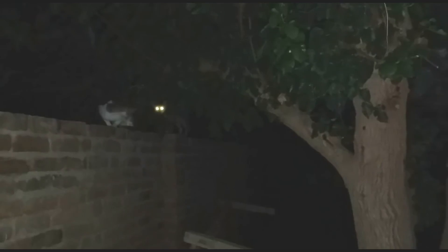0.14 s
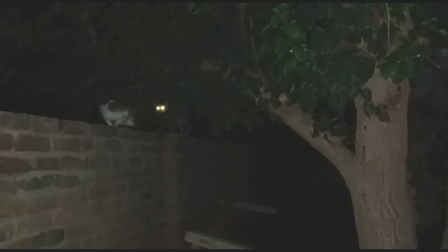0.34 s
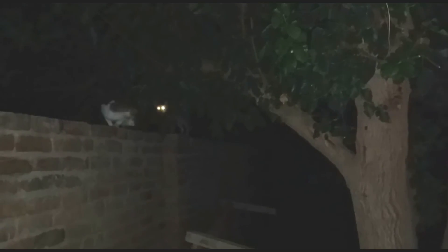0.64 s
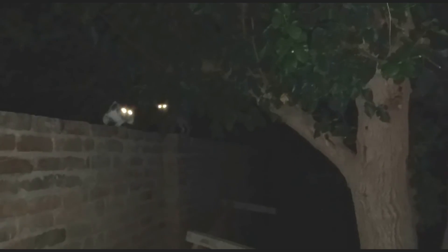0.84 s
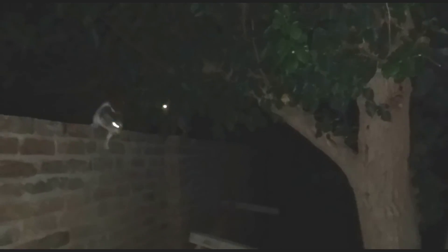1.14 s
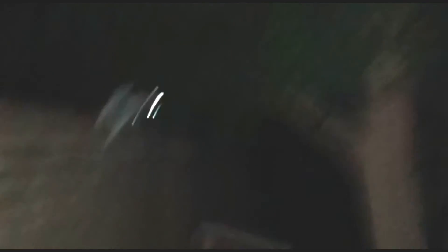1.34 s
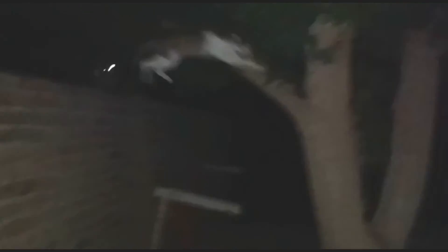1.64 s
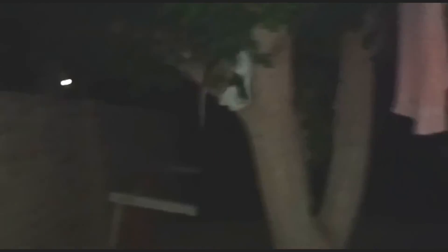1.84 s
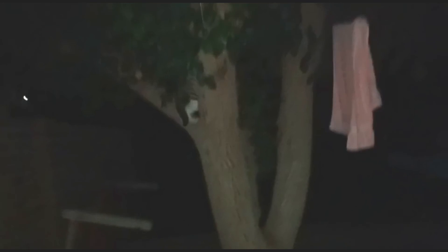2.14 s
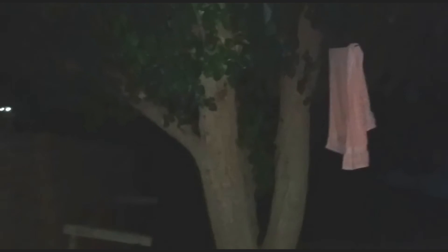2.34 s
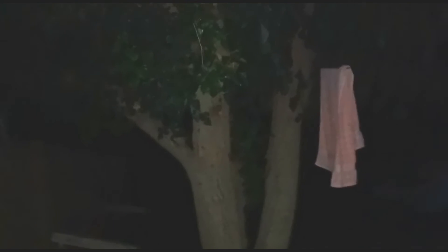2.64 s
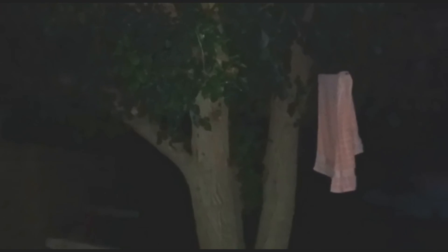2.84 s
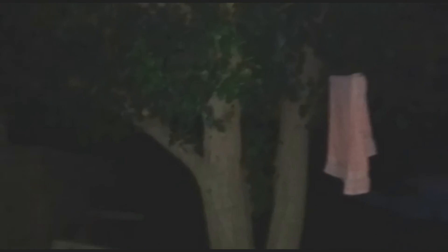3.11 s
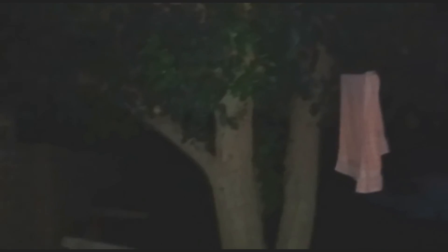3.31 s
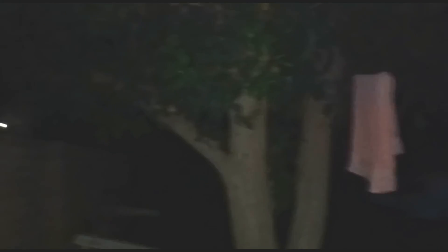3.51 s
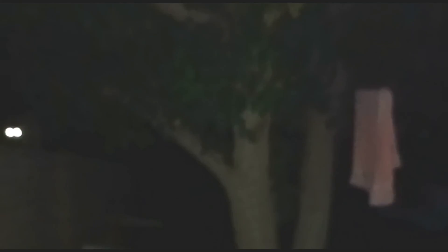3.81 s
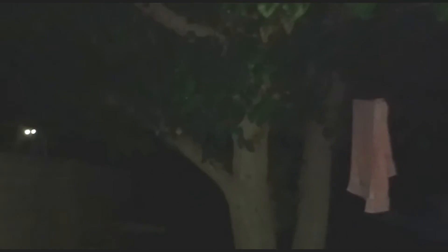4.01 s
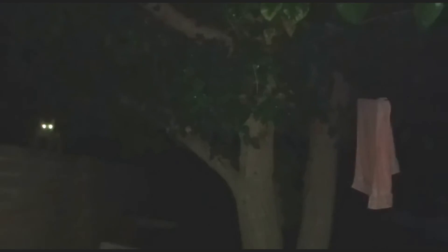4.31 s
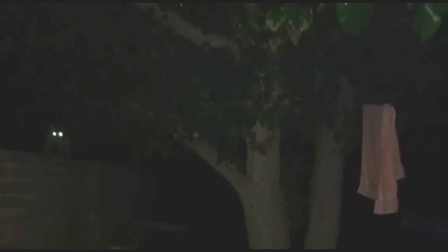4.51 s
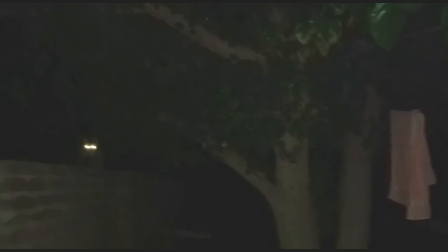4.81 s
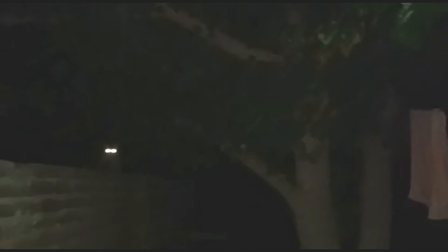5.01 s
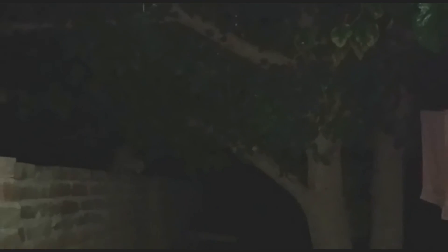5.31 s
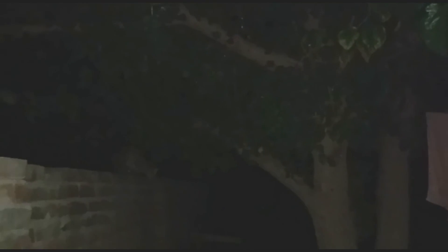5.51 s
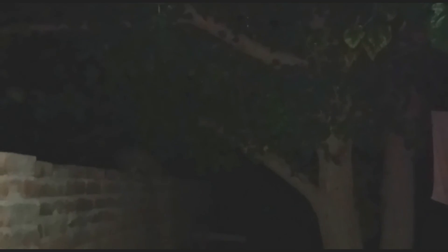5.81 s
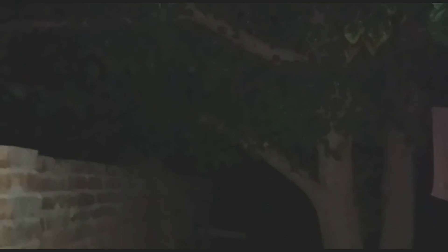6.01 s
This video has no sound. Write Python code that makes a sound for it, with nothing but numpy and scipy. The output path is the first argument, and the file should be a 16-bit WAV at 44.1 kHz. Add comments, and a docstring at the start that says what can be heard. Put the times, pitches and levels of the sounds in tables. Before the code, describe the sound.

A steady low fan tone and night air lie under a sudden cat fight outdoors. A hoarse yowl clears, rises and breaks into grating screeching from two animals, with short slaps of echo off brick. Leaves rustle and claws scratch bark, a cat spits and hisses, then rasps and cries into another screech. The noise subsides to humming, high insect ticking and a faint rising moan. The stereo microphone is at a distance in the yard.

```python
"""A cat's yowl, a harmonic series, clears and climbs at night, then breaks into a screech of irregular pulses and
noise; a rival's cry falls through it and the screech's low fundamental sounds beneath it. A cat scrambles up a
tree as noise bursts of leaves and claws, spits and hisses with resonant noise; rasps and a cry lead into a second
screech. Last, a low moan, one gliding sine, rises. Throughout, a fan motor drones in modulated sines beside a faint
whine and night air noise, a bush cricket ticks in runs of falling chirps, and brick walls answer with echoes."""
import sys
import numpy as np
from scipy import signal
from scipy.fft import rfft, irfft, next_fast_len
from scipy.io import wavfile
from scipy.ndimage import uniform_filter1d, minimum_filter1d, map_coordinates

SR = 44100
rng = np.random.default_rng(int(sys.argv[2]) if len(sys.argv) > 2 else 0)


def store_pcm(level_fs):
    """Save levels as 16-bit WAV."""
    pcm = np.round(np.clip(level_fs, -1, 1) * 32767).astype(np.int16)
    wavfile.write(sys.argv[1], SR, np.atleast_2d(pcm).T)


N = 271215

# Vocal effort of the yowl: (time [s], level [dB])
YOWL_EFFORT = [(0.25, -40), (0.316, -26.5), (0.364, -29), (0.39, -18), (0.484, -23.5), (0.498, -13),
               (0.528, -15), (0.575, -18), (0.634, -17), (0.666, -11.5), (0.702, -21), (0.736, -17),
               (0.775, -17)]
# Its strongest partials: (multiple of the pitch [1], relative level [dB])
YOWL_PARTIALS = [(1, -5.5), (1.5, -26), (2, 4.5), (3, -17.5)]
# Throat resonances that light up its overtones: (centre [Hz], width [Hz], relative level [dB])
YOWL_THROAT = [(2610, 320, -11), (5670, 1300, -20)]
YOWL_START_HZ, YOWL_CLIMB_HZ_PER_S = 441, 1000  # a steady climb of the pitch
LEAP_HZ, LEAP_AT_S, LEAP_WIDTH_S = 254.4, 0.45, 0.033  # one leap as the voice opens
CLEARS_AT_S, CLEARING_WIDTH_S = 0.367, 0.0052  # the hoarse start turns into a clear tone
REMAINING_NOISE_SHARE = 0.013  # share of the power [0-1]
BRIGHTENS_AT_S = 0.56  # the top overtones come in as the cat strains


def yowl():
    """Source and filter: a hoarse start clears into rising harmonics, the second one strongest."""
    effort_db, = curves(YOWL_EFFORT)
    age = np.minimum(since(YOWL_EFFORT[0][0]), 1)
    leap = LEAP_HZ * step(LEAP_AT_S, LEAP_WIDTH_S)
    pitch = YOWL_START_HZ + YOWL_CLIMB_HZ_PER_S * age + leap
    noise_share = np.clip(1 - step(CLEARS_AT_S, CLEARING_WIDTH_S) + REMAINING_NOISE_SHARE, 0, 1)
    jitter = 0.005 * wobble(120) + 0.06 * noise_share * wobble(400)
    phase = angle(pitch * (1 + jitter))
    tone = np.zeros(N)
    for multiple, level_db in YOWL_PARTIALS:
        tone += amp(level_db + 1.2 * wobble(30)) * np.sin(multiple * phase)
    # higher harmonics light up in patches as they sweep through the throat resonances
    strain = step(BRIGHTENS_AT_S, 0.016)
    for multiple, gain in [(4, 1), (5, strain), (6, strain)]:
        throat = sum(amp(level_db) * resonance(multiple * pitch, centre, width)
                     for centre, width, level_db in YOWL_THROAT)
        tone += gain * throat * amp(2.5 * wobble(35)) * np.sin(multiple * phase)
    # a small mouth radiates little bass, so the fundamental emerges only as it climbs
    tone = steady(filtered(tone, lambda hz: 1 / (1 + (800 / (hz + 1)) ** 8)))
    rasp = mouth(rng.standard_normal(N), 2 * pitch, q=2.2)
    mixture = np.sqrt(1 - noise_share) * tone + np.sqrt(noise_share) * rasp
    voice = mixture * amp(effort_db) * during(YOWL_EFFORT)
    return in_yard(voice, lead_ms=0.06, pan_db=-1.5, wet_db=-11)


def screeches():
    """Superposition and reflection: all the rough calls sound together and the yard answers them."""
    cries = cry(FALLING_CRY) + cry(LEADING_CRY)
    calls = wall_screech() + cries + rasps() + tree_screech()
    return in_yard(calls, lead_ms=0.06, pan_db=-1.8, wet_db=-8)


# The screech on the wall: (time [s], mouth resonance [Hz], mouth band level [dB], upper throat level [dB])
WALL_SCREECH = [(0.765, 1770, -19.5, -25), (0.844, 1630, -11, -22), (0.905, 1440, -12.5, -24),
                (0.985, 1450, -13.5, -27.5), (1.075, 1090, -19.5, -26.5), (1.126, 1070, -16.5, -29),
                (1.19, 945, -20.5, -31.5), (1.268, 955, -18.5, -36.5), (1.292, 970, -34.5, -46),
                (1.395, 970, -32, -45)]
# Its roughness: (time [s], noise share of the power [0-1], depth of alternating pulses [0-1])
WALL_ROUGHNESS = [(.78, .4, .45), (.93, .14, .3), (1.13, .28, .95)]
# Its upper throat: (centre with jaw shut [Hz], centre with jaw wide [Hz], width [Hz], relative level [dB])
WALL_THROAT = [(1700, 1800, 640, -12.5), (2375, 2764, 174, -0.5), (4800, 5310, 390, -21),
               (5540, 6370, 1200, -21)]
SAG_START_HZ, SAG_REST_HZ, SAG_S = 469, 400.3, 0.15  # the pitch sags toward a resting value


def wall_screech():
    """Irregular fold vibration: rough at the break, then voiced, then doubled and rough as the mouth closes."""
    centre, mouth_db, upper_db = curves(WALL_SCREECH)
    noise_share, doubling = curves(WALL_ROUGHNESS)
    sag = np.exp(-since(WALL_SCREECH[0][0]) / SAG_S)
    pitch = SAG_REST_HZ + (SAG_START_HZ - SAG_REST_HZ) * sag
    source = folds(pitch, noise_share, jitter=0.011, lurch=0.02, rattle=0.45, doubling=doubling)
    return screech(source, centre, mouth_db, upper_db, WALL_THROAT, q=2.7) * during(WALL_SCREECH)


# The screech from the tree: (time [s], mouth resonance [Hz], mouth band level [dB], upper throat level [dB])
TREE_SCREECH = [(3.25, 1327, -23, -29), (3.285, 1478, -16, -31.5), (3.345, 1603, -19.5, -23),
                (3.41, 1501, -22.5, -28), (3.48, 1618, -20.5, -22), (3.525, 1586, -12, -27.5),
                (3.565, 1397, -21, -30.5), (3.69, 1019, -23, -36), (3.78, 982, -32.5, -46),
                (3.93, 989, -36.5, -54)]
# Upper throat, shared with the cries: (jaw shut [Hz], jaw wide [Hz], width [Hz], relative level [dB])
TREE_THROAT = [(770, 1234, 89, 3), (2270, 2460, 760, -5), (2400, 3460, 270, -11.5),
               (5000, 5270, 560, -12.5), (6500, 7500, 2900, -25)]
PITCH_BREAKS_AT_S = 3.58  # turbulence takes over from here


def tree_screech():
    """Coupled pitch and resonance: both rise under strain, hold, and fall back into a broken growl."""
    centre, mouth_db, upper_db = curves(TREE_SCREECH)
    noise_share = 0.28 + 0.5 * step(PITCH_BREAKS_AT_S, 0.03)
    source = folds(centre / 3, noise_share, jitter=0.022, lurch=0.036, rattle=0.65, doubling=0.9)
    return screech(source, centre, mouth_db, upper_db, TREE_THROAT, q=2.5) * during(TREE_SCREECH)


# A rival's cry that falls through the first screech: (time [s], mouth resonance [Hz], level [dB])
FALLING_CRY = [(0.80, 1880, -22.5), (0.848, 1720, -7), (0.89, 1510, -21), (1.06, 1366, -21),
               (1.125, 1210, -15), (1.17, 1130, -23)]
# The cry that leads into the second screech: (time [s], mouth resonance [Hz], level [dB])
LEADING_CRY = [(2.915, 1462, -21), (2.935, 1479, -23), (3.06, 1475, -29), (3.08, 1124, -24.5),
               (3.19, 1213, -14.5), (3.255, 1320, -24)]


def cry(rows):
    """Resonance tuning: a hoarse voice passes a narrow mouth that sits on its third harmonic."""
    centre, level_db = curves(rows)
    source = folds(centre / 3, 0.38, jitter=0.02, lurch=0.018, rattle=0.5, doubling=0.4)
    return screech(source, centre, level_db, level_db - 22, TREE_THROAT, q=4.2) * during(rows)


# Hoarse bursts around the leading cry: (peak time [s], rise [s], fall [s], level [dB])
RASPS = [(2.838, 0.078, 0.064, -22), (2.936, 0.1, 0.13, -21), (3.104, 0.082, 0.046, -23),
         (3.144, 0.03, 0.023, -12.5), (3.19, 0.093, 0.092, -17)]
RASP_HZ, RASP_Q = 1183, 2.74  # mouth resonance and its sharpness


def rasps():
    """Turbulent excitation: fluttering noise without pitch rings the narrow mouth."""
    turbulence = rng.standard_normal(N) * amp(2 * wobble(150))
    return swells(RASPS) * mouth(turbulence, np.full(N, RASP_HZ), RASP_Q)


SHUT_HZ, WIDE_HZ = 1060, 1610  # mouth resonance with the jaw nearly shut and wide open


def screech(source, centre, mouth_db, upper_db, throat, q):
    """Formant filtering: the folds ring mouth and upper throat, whose resonances climb as the jaw opens."""
    gape = np.clip((centre - SHUT_HZ) / (WIDE_HZ - SHUT_HZ), 0, 1.2)

    def throat_gain(hz, opening):
        return sum(amp(level_db) * resonance(hz, shut + (wide - shut) * opening, width)
                   for shut, wide, width, level_db in throat)

    mouth_band = amp(mouth_db) * mouth(source, centre, q)
    throat_band = amp(upper_db) * moving(source, gape, throat_gain)
    return mouth_band + throat_band


RATTLE_HZ = 111.9  # mean rate at which loose throat tissue chops the hoarse calls


def folds(rate, noise_share, jitter, lurch, rattle, doubling):
    """Irregular self-oscillation: overdriven folds mix pulses and turbulence, chopped by the throat's rattle."""
    phase = angle(rate * (1 + jitter * wobble(350) + lurch * wobble(45)))
    # the throat rings on after each pulse and spreads it over the whole cycle
    pulses = sum(np.cos(k * phase - k * k * np.pi / 7) for k in np.arange(2, 21))
    # in fits, strong and weak pulses alternate and add strands halfway between the harmonics
    alternation = (doubling + 0.3 * wobble(25)) * np.sign(np.cos(phase / 2))
    pulses = steady(pulses * (1 + alternation))
    turbulence = unit(rng.standard_normal(N) * (1 + 0.8 * np.cos(phase)))
    rattling = np.sin(angle(RATTLE_HZ * (1 + 0.3 * wobble(70))))
    chop = (1 + rattle * rattling) * amp(1.2 * wobble(110))
    mixture = np.sqrt(1 - noise_share) * pulses + np.sqrt(noise_share) * turbulence
    return ragged(mixture * chop, depth_db=3.2)


def ragged(x, depth_db):
    """Spectral modulation: strands of a strained voice flare and drop out in short patches."""
    z = signal.stft(x, SR, nperseg=1024)[2]
    patches = uniform_filter1d(rng.standard_normal(z.shape), size=3, axis=0)
    patches = unit(uniform_filter1d(patches, size=3, axis=1))
    return signal.istft(z * amp(depth_db * patches), SR, nperseg=1024)[1][:N]


# A spit and a long throaty hiss: (peak time [s], rise [s], fall [s], resonance scale [1], level [dB])
HISSES = [(1.851, 0.055, 0.11, 1.56, -36), (2.27, .2, 0.57, 0.965, -32.5)]
# Open throat before scaling: (centre [Hz], width [Hz], relative level [dB])
HISS_THROAT = [(1034, 560, 1), (1515, 130, -6), (1960, 780, -8), (5070, 1600, -15.5)]


def hisses():
    """Turbulence in a tube: air rasps in an open throat; bared teeth and drawn lips raise the spit's resonances."""
    out = np.zeros(N)
    for peak, rise, fall, scale, level_db in HISSES:
        def throat(hz):
            return sum(amp(db) * resonance(hz / scale, centre, width) for centre, width, db in HISS_THROAT)

        air = rng.standard_normal(N) * amp(3.2 * wobble(170))
        out += amp(level_db) * swell(peak, rise, fall) * unit(filtered(air, throat))
    return in_yard(out, lead_ms=0, pan_db=-2.5, wet_db=-7)


# The screech's low fundamental, then a low closed-mouth moan:
# (peak time [s], rise [s], fall [s], first pitch [Hz], last pitch [Hz], level [dB])
LOW_TONES = [(0.951, 0.118, 0.14, 455.6, 391, -30.5), (5.66, .16, 2.5, 350.7, 496.6, -32)]
GLIDE_S = 0.21  # time constant of the pitch


def low_fundamental_and_moan():
    """Pure tone: one sine each, the fundamental alone, whose pitch settles exponentially."""
    out = np.zeros(N)
    for peak, rise, fall, first_hz, last_hz, level_db in LOW_TONES:
        age = since(peak - rise)
        pitch = last_hz + (first_hz - last_hz) * np.exp(-age / GLIDE_S)
        phase = angle(pitch * (1 + 0.018 * wobble(60)))
        out += amp(level_db) * swell(peak, rise, fall) * unit(np.sin(phase))
    return in_yard(out, lead_ms=0.02, pan_db=-1, wet_db=-9)


# Lunges through the foliage: (peak time [s], rise [s], fall [s], level [dB])
LUNGES = [(1.17, 1.44, 0.52, -42), (1.87, 0.32, 0.11, -39), (2.42, 0.58, 0.42, -34.5),
          (3.55, 1.6, 0.64, -39.5), (3.98, 0.066, 0.17, -37)]
# Spectrum of leaves and claws: (frequency [Hz], relative level [dB])
LEAF_COLOUR = [(500, -31), (4500, -0.5), (8000, -5.5), (12500, -3.5), (15500, -8)]
# Claw ticks on the bark: (time [s], level at onset [dB])
CLAWS = [(1.1742, -34.5), (1.801, -41), (2.8509, -33.5), (3.9798, -36)]
# Soft paw thuds, before their onsets are smoothed: (time [s], level [dB])
PAWS = [(.84, -35), (1.03, -38), (1.25, -35.5)]
# Spectrum of the thuds: (frequency [Hz], relative level [dB])
PAW_COLOUR = [(25, -17), (140, 2), (260, 7), (1000, -64)]


def scramble():
    """Impact and friction noise: leaves thrash, claws tick on the bark, paws land and decay."""
    flutter = unit(amp(3 * wobble(800) + 1.2 * wobble(40)))
    leaves = swells(LUNGES) * rush(LEAF_COLOUR) * flutter
    claws = blows(CLAWS, t60=0.069) * rush(LEAF_COLOUR)
    thuds = uniform_filter1d(blows(PAWS, t60=1.0), size=400)
    return leaves + claws + thuds * rush(PAW_COLOUR)


def blows(rows, t60):
    """Exponential decay: each blow starts at once and loses 60 dB in t60 seconds."""
    t = np.arange(N) / SR
    return sum((t >= s) * amp(level_db - 60 * np.abs(t - s) / t60) for s, level_db in rows)


# Runs of chirps: (first chirp [s], end of run [s], period [s])
CHIRP_RUNS = [(0.076, 1.2, .0955), (2.53, 3.6, .112), (3.675, 6.15, .1028)]


def cricket():
    """Stridulation: three falling wing strokes a chirp, the middle strongest; foliage smears them into a hiss."""
    t = np.arange(-700, 700) / SR
    strokes = np.zeros(N + SR)
    for first, end, period in CHIRP_RUNS:
        for s in np.arange(first, end, period):
            for offset_s, level_db in [(-0.019, -44.5), (0, -41), (0.018, -49.5)]:
                hz = 7350 - 100000 * t + rng.normal(0, 121)
                gain = amp(level_db + rng.normal(0, 2.4)) * np.exp(-(t / 0.0037) ** 2)
                start = max(round((s + offset_s) * SR) - len(t) // 2, 0)
                strokes[start:start + len(t)] += gain * np.sin(angle(hz))
    strokes = strokes[:N]
    activity = np.sqrt(np.abs(uniform_filter1d(strokes ** 2, size=SR // 3)))
    # spectrum of the smear: (frequency [Hz], relative level [dB])
    hiss = rush([(6300, -14.5), (7200, -7.0), (7900, -8.0), (8800, -19.5)])
    return in_yard(strokes, lead_ms=0, pan_db=-4.5, wet_db=0.5) + amp(6.5) * activity * hiss


# Blade tone, before panning: (time [s], rms level [dB])
BLADE_TONE = [(0.78, -25), (1.14, -30.5), (1.49, -27.5), (2.47, -29.5), (3.7, -26.5), (4.99, -21),
              (6.15, -32.5)]
# Its lower sideband, the throb, before panning: (time [s], rms level [dB])
THROB = [(0, -45.5), (2.6, -35.5), (5, -40.5)]
# Weaker motor tones, before panning: (frequency [Hz], rms level [dB])
MOTOR_TONES = [(250.5, -51), (303, -45.5), (377, -51.5), (466.5, -46.5), (958, -52.5), (1453, -55.5)]
# Stereo balance: (time [s], left minus right level [dB])
FAN_PAN = [(3.8, 0.3), (5.2, -6.5), (6.15, -5.5)]
BLADE_HZ, SHAFT_HZ = 340, 21.7  # mean rates


def fan():
    """Amplitude modulation: a blade tone gains sidebands at the shaft rate, among weaker motor tones."""
    pan_db, = curves(FAN_PAN)
    blade_db, = curves(BLADE_TONE)
    throb_db, = curves(THROB)
    blade = angle(BLADE_HZ + 0.4 * wobble(6))
    shaft = angle(SHAFT_HZ + 0.7 * wobble(4))
    tone = amp(blade_db + 0.5 * wobble(16)) * np.sin(blade)
    lower = amp(throb_db + wobble(6)) * np.sin(blade - shaft)
    upper = amp(-48) * np.sin(blade + shaft)
    motor = np.zeros(N)
    for hz, level_db in MOTOR_TONES:
        motor += amp(level_db + 2.5 * wobble(6)) * np.sin(angle(hz + 1.2 * wobble(8)))
    sides = np.array([[0.5], [-0.5]])
    return np.sqrt(2) * (tone + lower + upper + motor) * amp(pan_db * sides)


# A faint tone that wanders: (time [s], frequency [Hz])
WHINE = [(3.2, 537.4), (4.4, 520.5), (5.75, 561.2)]


def whine():
    """Frequency modulation: one faint sine drifts and trembles in pitch."""
    hz = curves(WHINE)[0] + 5 * wobble(30)
    return amp(-42 + 2 * wobble(10)) * unit(np.sin(angle(hz)))


# Night air: (time [s], level [dB])
AIR = [(0, -33.5), (1.5, -37.5), (4.2, -35.5), (5.1, -34.5)]
# Its spectrum: (frequency [Hz], relative level [dB])
AIR_COLOUR = [(25, -62), (68, -4.5), (130, -3), (300, 5.5), (540, 7.5), (680, -4.5), (950, 2.5), (1200, -4),
              (1500, -2), (4000, -14), (9000, -24.5), (15500, -27)]


def night_air():
    """Broadband noise: a coloured stereo rush follows a slow level curve."""
    return amp(curves(AIR)[0]) * rush(AIR_COLOUR)


# Delay of the left channel behind the right: (time [s], lag [ms])
BACKGROUND_LAG = [(3.7, -0.17), (4.2, 0.17), (6.15, 0.065)]


def turning(pair):
    """Interaural delay: a drifting lag between left and right moves the background sideways."""
    lag = curves(BACKGROUND_LAG)[0] * SR / 1000  # in samples
    return np.array([map_coordinates(x, [np.arange(N) - side * lag], mode="mirror")
                     for x, side in zip(pair, (0.5, -0.5))])


# Decay of the brick yard: (frequency [Hz], time to fall 60 dB [s])
YARD = [(200, 0.013), (1500, 0.19), (10000, 0.0072)]


def in_yard(x, lead_ms, pan_db, wet_db):
    """Reverberation: direct sound may lead in the left channel, and the walls add a short scattered answer."""
    hz, t, z = signal.stft(rng.standard_normal((2, SR // 2)), SR, nperseg=256)
    decay = amp(-60 * t / along(YARD, hz)[:, None])
    tail = signal.istft(z * decay, SR, nperseg=256)[1]
    tail = tail / np.linalg.norm(tail[0])
    delayed = np.pad(x, (200, 0))[None]
    echo = signal.fftconvolve(delayed, tail, axes=1)[:, :N]
    sides = np.array([[0.5], [-0.5]])
    direct = filtered(x, lambda f: np.exp(2j * np.pi * f * sides * lead_ms / 1000))
    return (direct + amp(wet_db) * echo) * amp(sides * pan_db)


# Stereo likeness of noise: (frequency [Hz], left-right correlation [0-1])
LIKENESS = [(150, 0.92), (1200, 0.29), (5000, 0.026)]


def rush(colour):
    """Spatial coherence: stereo noise of rms 1, alike in the bass and unrelated in the treble."""
    def mid_side(hz):
        turn = np.arccos(np.clip(along(LIKENESS, hz), -1, 1)) / 2
        return amp(along(colour, hz)) * [np.cos(turn), np.sin(turn)]

    mid, side = filtered(rng.standard_normal((2, N)), mid_side)
    return unit(np.array([mid + side, mid - side]))


def mouth(x, centre, q):
    """Cavity resonance: one moving peak, applied twice, with steep skirts."""
    def gain(f, c):
        skirts = 1 / (1 + (c / f / 1.75) ** 10 + (f / c / 2) ** 8)
        return skirts / (1 + (q * (f / c - c / f)) ** 2)

    return moving(x, centre, gain)


def moving(x, centre, gain):
    """Time-varying filtering: apply gain(Hz, centre) as the centre moves, then hold the rms at 1."""
    hz, t, z = signal.stft(x, SR, nperseg=512)
    now = np.interp(t, np.arange(N) / SR, centre)
    return steady(signal.istft(z * gain(hz[:, None] + 1, now), SR, nperseg=512)[1][:N])


def resonance(hz, centre, width):
    """Resonance curve: a peak of gain 1 that halves at half a width to either side."""
    return 1 / (1 + (2 * (hz - centre) / width) ** 2)


def filtered(x, response):
    """Linear filtering: multiply the spectrum of x by a response of frequency."""
    m = next_fast_len(N + SR // 2)
    return irfft(rfft(x, m) * response(np.fft.rfftfreq(m, 1 / SR)), m)[..., :N]


SWELL_DB = 21.5  # range that each rise and fall time spans


def swell(peak, rise, fall):
    """Exponential envelope: the gain grows to its peak and dies away, evenly in dB."""
    t = np.arange(N) / SR - peak
    return amp(-SWELL_DB * np.minimum(np.maximum(-t / rise, t / fall), 10))


def swells(rows):
    """Power addition: joint gain of overlapping (peak [s], rise [s], fall [s], level [dB]) events."""
    return np.sqrt(sum((amp(db) * swell(peak, rise, fall)) ** 2 for peak, rise, fall, db in rows))


def amp(db):
    """Logarithmic level: decibels to gain."""
    return 10 ** (np.asarray(db) / 20)


def unit(x):
    """Normalisation: scale to rms 1."""
    return x / np.sqrt(np.mean(x ** 2) + 1e-20)


def steady(x):
    """Level equalisation: hold the short-term rms at 1."""
    return x / np.sqrt(np.abs(uniform_filter1d(x ** 2, size=1100)) + 1e-12)


def along(points, hz):
    """Logarithmic frequency scale: interpolate (frequency [Hz], value) points."""
    f, v = np.transpose(points)
    return np.interp(np.log(hz + 1), np.log(f + 1), v)


def curves(rows):
    """Linear interpolation: one value per sample for each column after the time."""
    s, *columns = np.transpose(rows)
    return [np.interp(np.arange(N) / SR, s, column) for column in columns]


def during(rows):
    """Gating: 1 over the span of a table, with soft edges."""
    t = np.arange(N) / SR
    inside = (t >= rows[0][0]) & (t <= rows[-1][0])
    return uniform_filter1d(inside * 1.0, size=600)


def wobble(rate):
    """Band-limited fluctuation: a smooth random curve with rate knots a second."""
    knots = rng.standard_normal(int(N * rate / SR) + 4)
    return map_coordinates(knots, [np.arange(N) * rate / SR])


def angle(hz):
    """Phase accumulation: running phase of a changing frequency."""
    return 2 * np.pi * np.cumsum(hz) / SR


def step(at, width):
    """Sigmoid transition: a smooth rise from 0 to 1 around a moment."""
    return 0.5 + 0.5 * np.tanh((np.arange(N) / SR - at) / (2 * width))


def since(start):
    """Elapsed time: seconds since a moment, 0 before it."""
    return np.maximum(np.arange(N) / SR - start, 0)


def scene():
    """Superposition: cats, tree and cricket over the fan, a faint whine and the night air."""
    cats = yowl() + screeches() + hisses() + low_fundamental_and_moan()
    background = turning(fan() + whine() + night_air())
    return cats + scramble() + cricket() + background


def record(dry):
    """Peak limiting and band limiting: the highest peaks are ducked and the extreme treble removed."""
    needed = 1 / np.maximum(np.abs(dry).max(axis=0), 1)
    gain = uniform_filter1d(minimum_filter1d(needed, size=300), size=300)
    return filtered(dry * gain, lambda hz: hz < 15550)


dry = scene()
out = record(dry)
store_pcm(out)
```